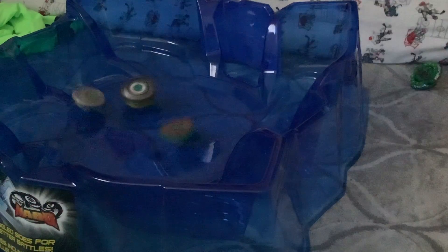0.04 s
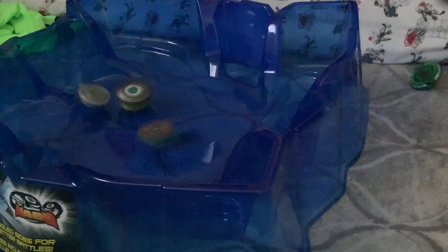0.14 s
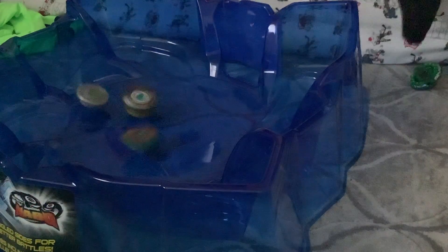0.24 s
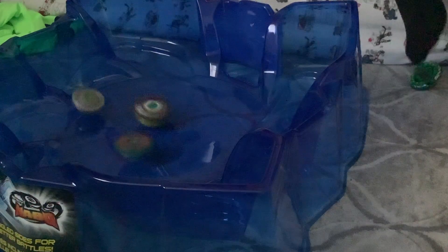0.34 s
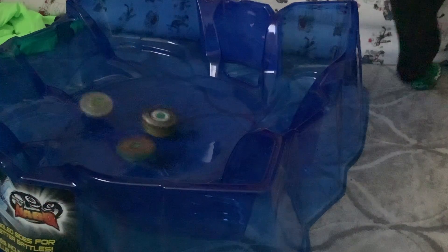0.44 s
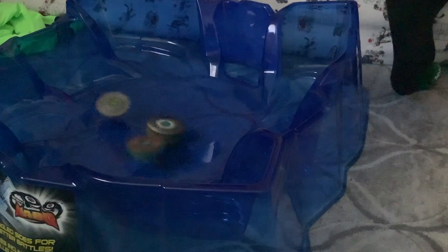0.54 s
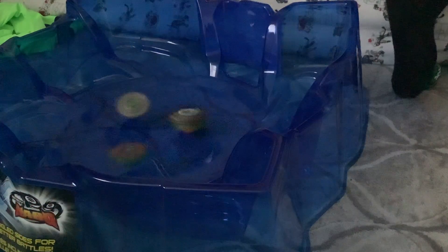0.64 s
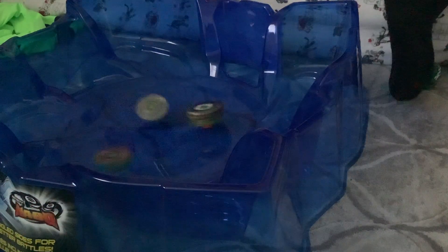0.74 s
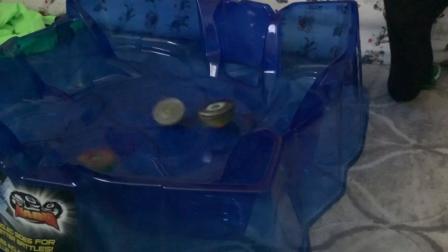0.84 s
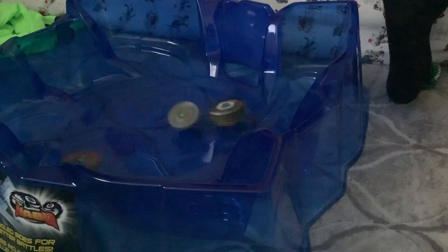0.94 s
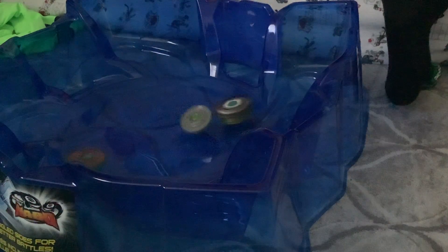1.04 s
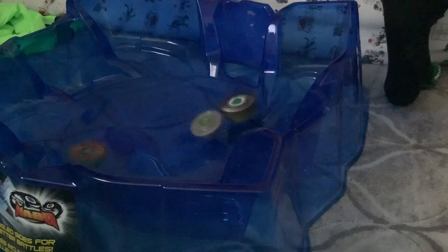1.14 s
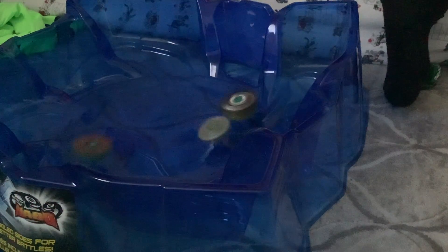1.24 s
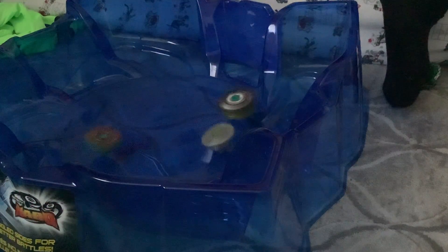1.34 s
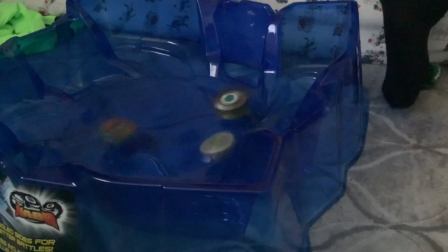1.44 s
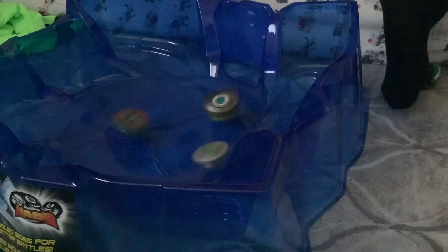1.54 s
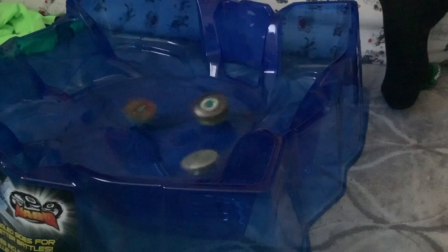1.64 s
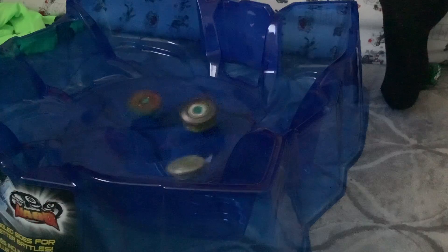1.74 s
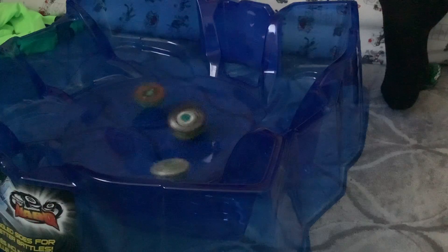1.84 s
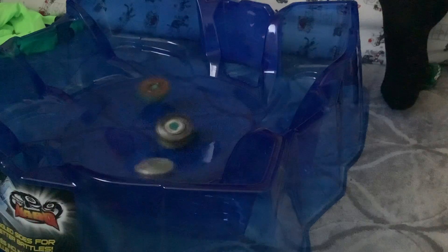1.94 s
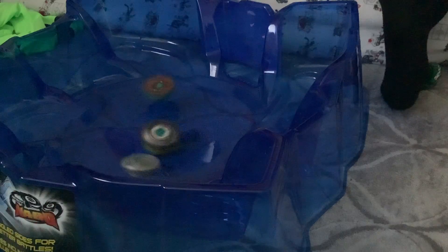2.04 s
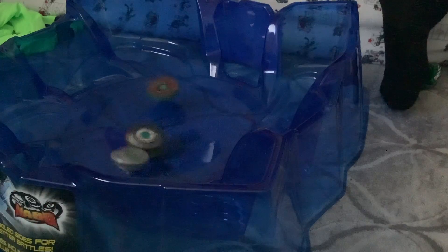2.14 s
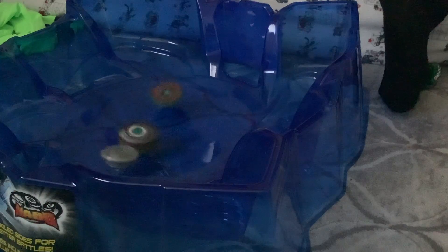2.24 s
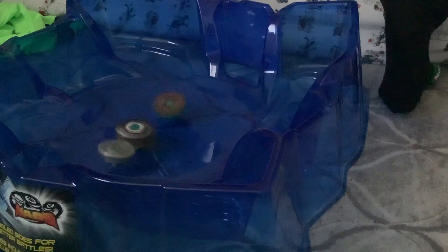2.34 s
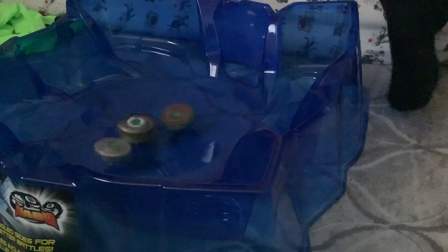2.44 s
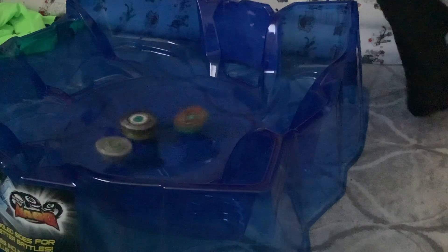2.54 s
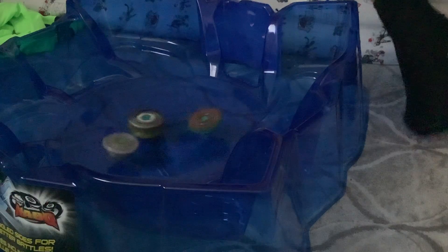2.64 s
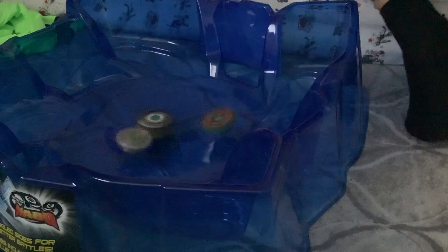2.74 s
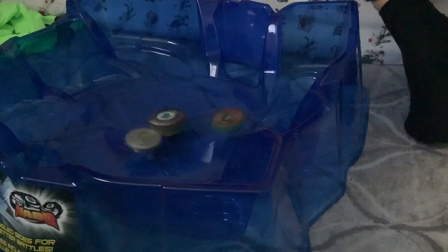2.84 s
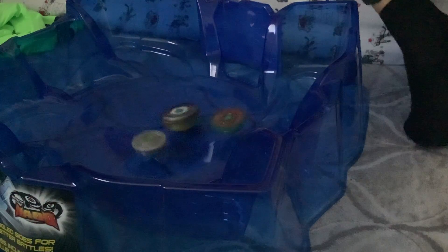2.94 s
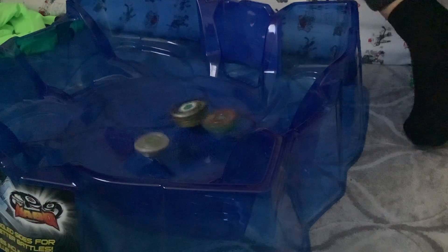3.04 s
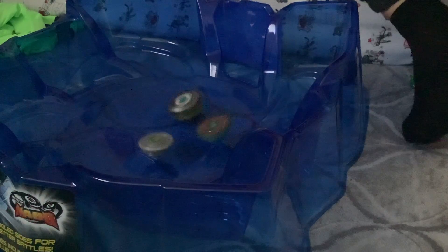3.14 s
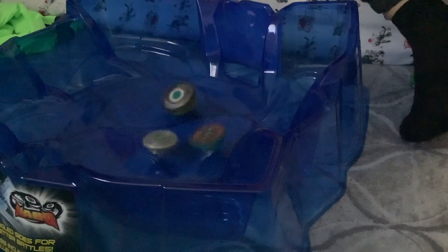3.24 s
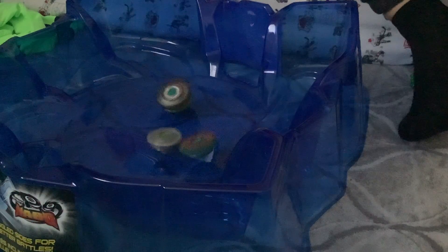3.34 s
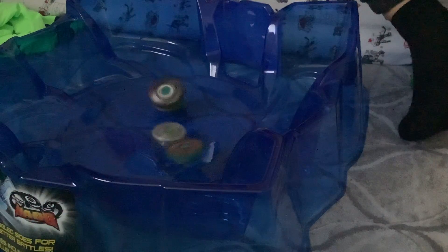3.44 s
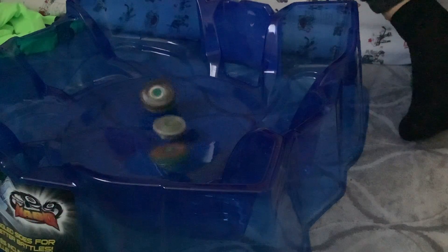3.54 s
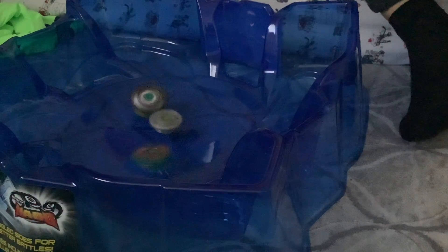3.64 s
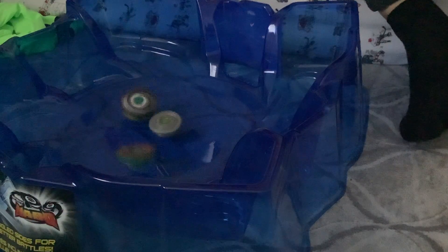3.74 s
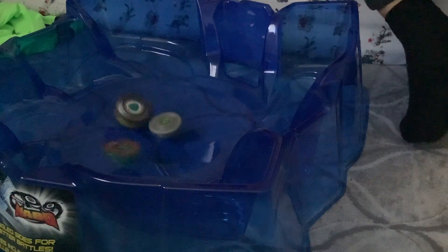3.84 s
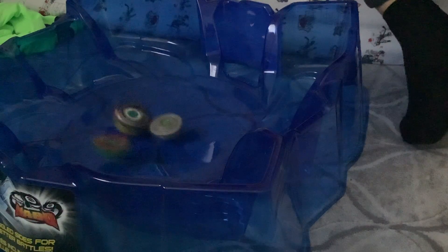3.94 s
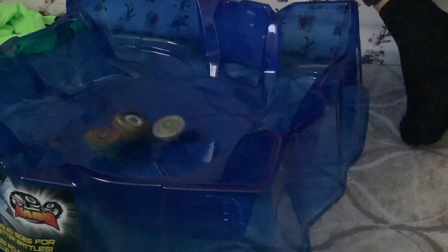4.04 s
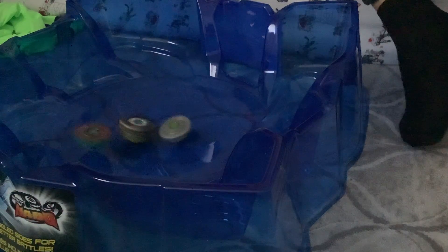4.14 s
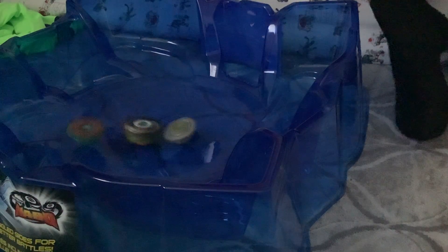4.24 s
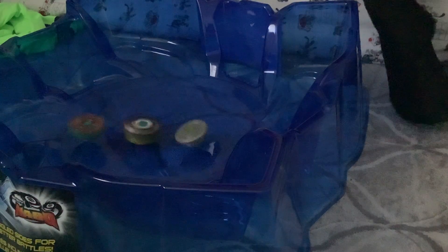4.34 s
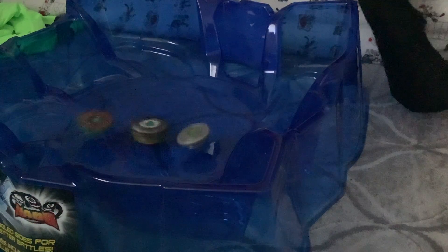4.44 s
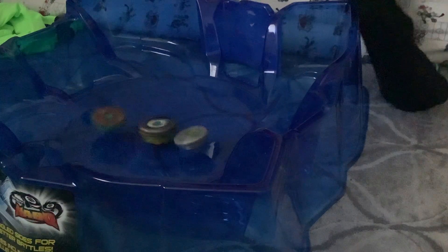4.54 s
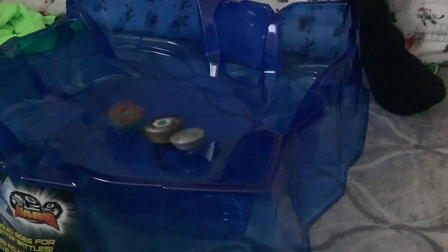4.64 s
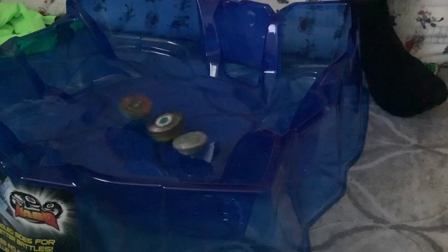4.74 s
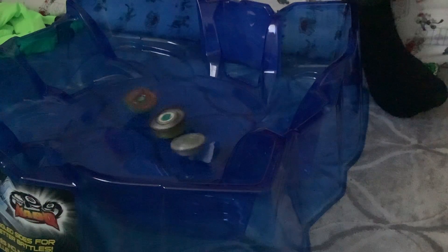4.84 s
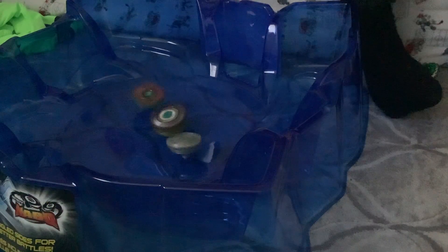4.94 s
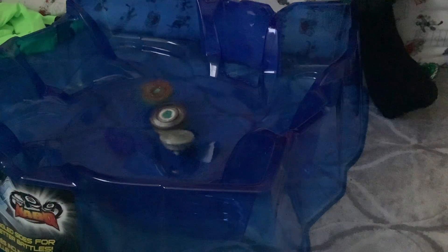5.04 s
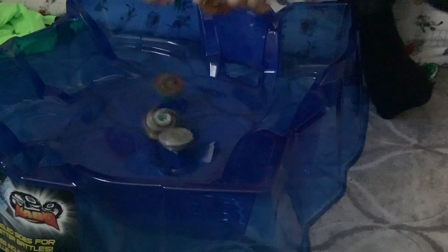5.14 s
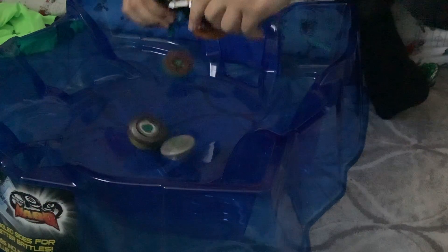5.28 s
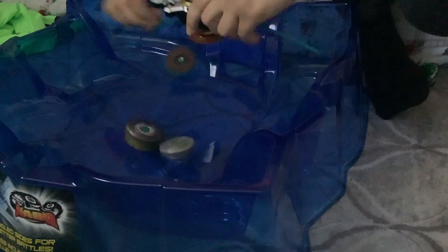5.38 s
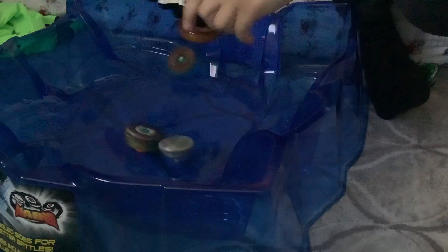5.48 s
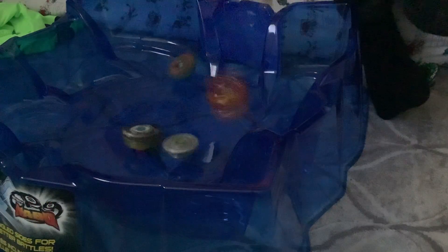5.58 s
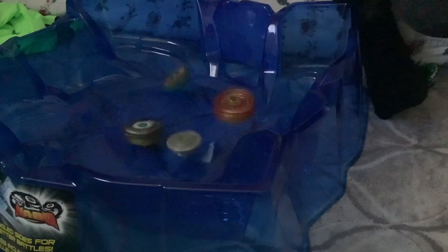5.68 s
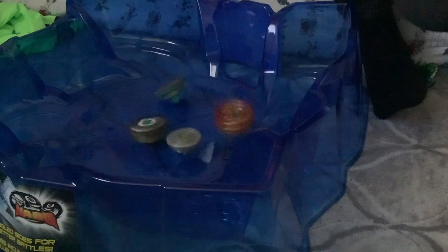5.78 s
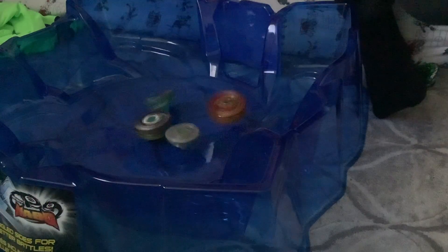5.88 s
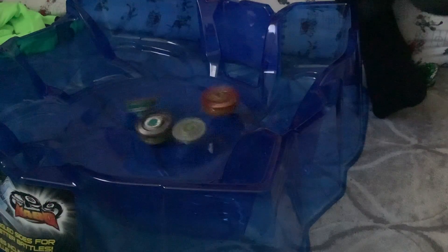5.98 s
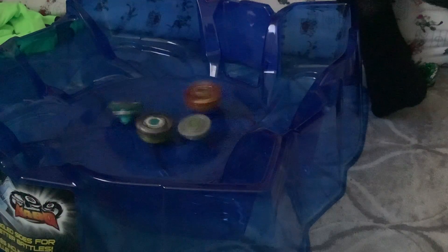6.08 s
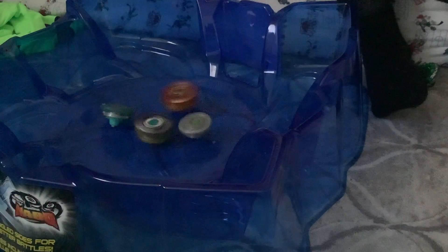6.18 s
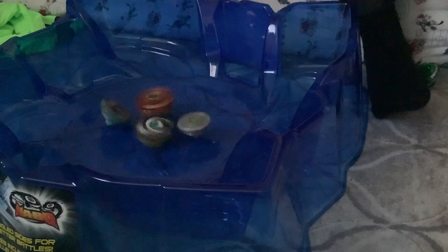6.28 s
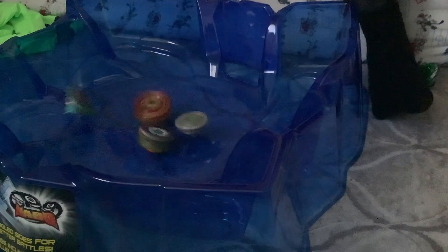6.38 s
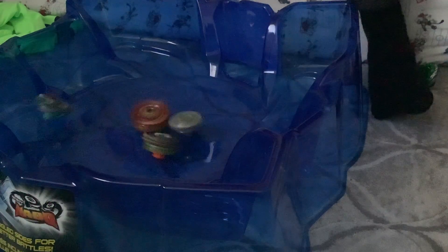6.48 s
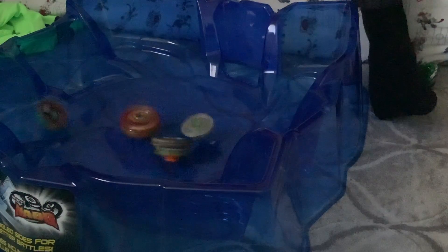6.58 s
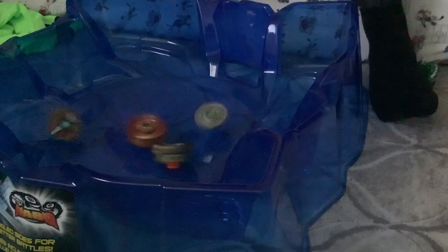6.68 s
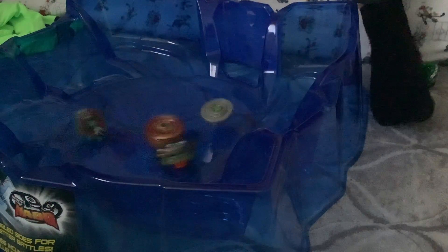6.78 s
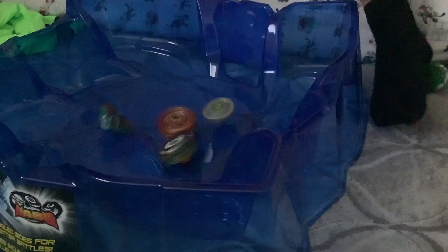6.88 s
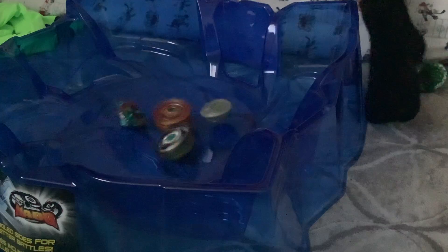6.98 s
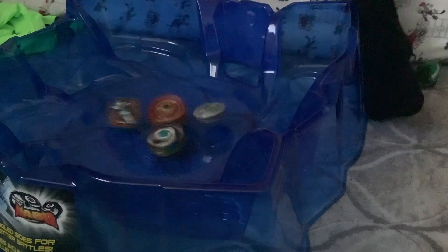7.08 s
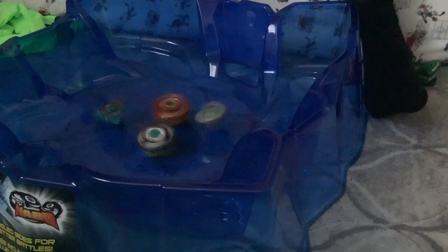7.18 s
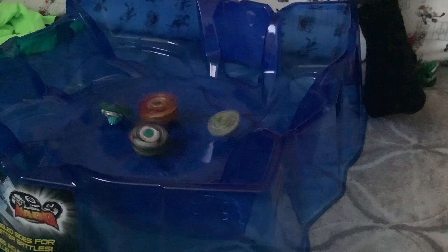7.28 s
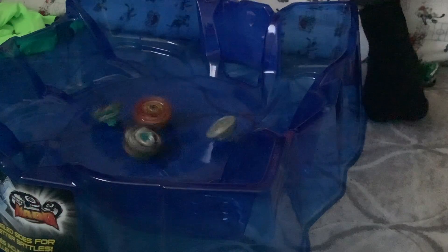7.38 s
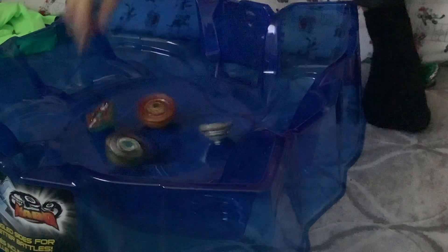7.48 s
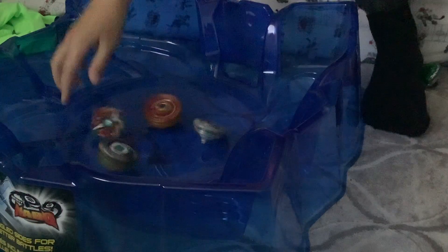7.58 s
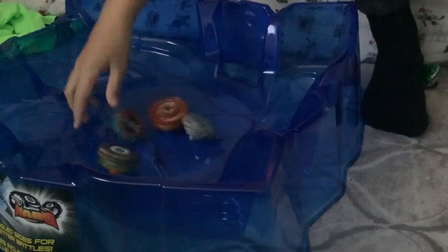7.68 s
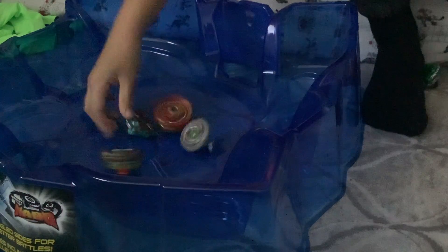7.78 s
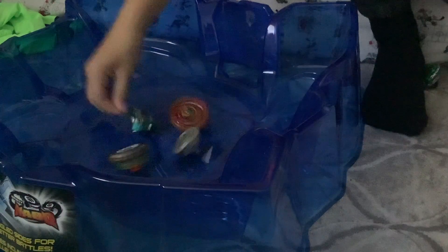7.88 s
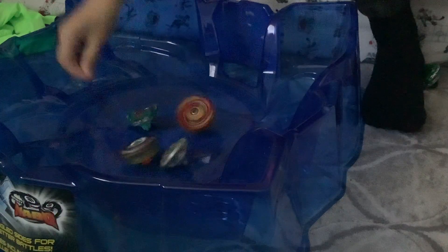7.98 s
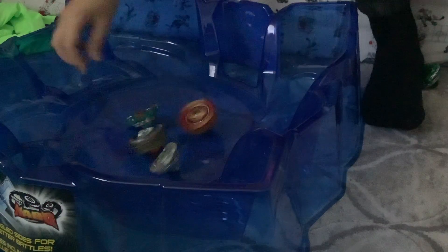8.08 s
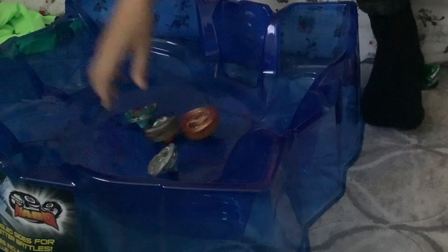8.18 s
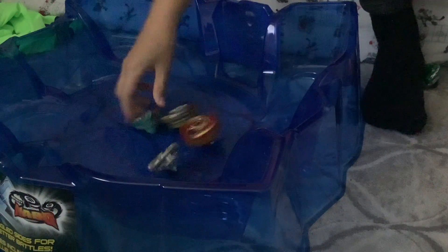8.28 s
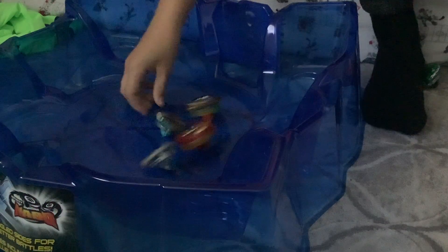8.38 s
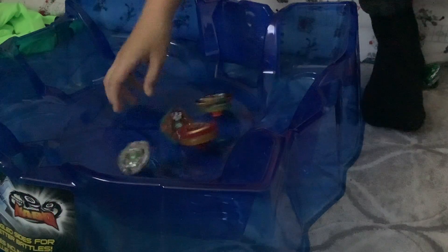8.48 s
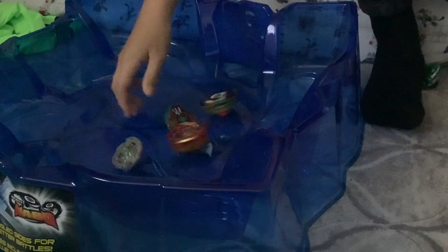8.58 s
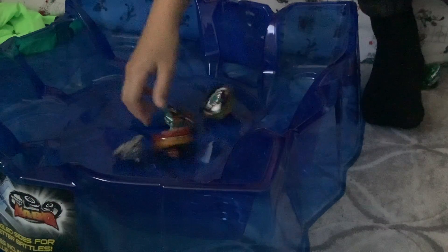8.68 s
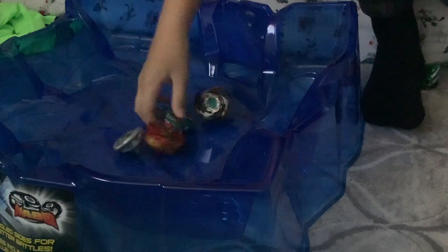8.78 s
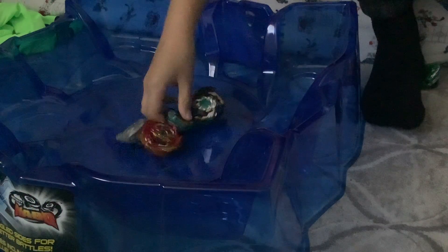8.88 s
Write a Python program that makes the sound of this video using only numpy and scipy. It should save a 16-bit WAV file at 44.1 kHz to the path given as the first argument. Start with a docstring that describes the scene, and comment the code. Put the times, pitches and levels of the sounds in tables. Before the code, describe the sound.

Close indoor sound of metal-rimmed tops in a thin plastic tray, with short dry reflections. A quiet low drone, wavering hum and fine grainy scrape run throughout. A double click comes at 0.3 s and a stronger one at 0.65, then mostly light rolling until 2.2. From 2.2 to 3.2 s bright clicks come in small clusters, with faint chirping skids. Single clicks at 3.7 and 4.0 lead to a cluster around 4.1-4.3 with a hollow knock, and another at 4.75. Sharp clicks at 5.2 precede slow ratchet teeth at 5.43, then a fast bright ripcord zip to about 5.6. At 5.7 a top lands with a loud crack and deep thud. Heavier clashes follow, strong at 5.87, 6.39 and 6.5, a thin metal ring at 6.56. Dense clicking and rough rumbling fill 7.1-8.45, notably boomy at 7.83, then weaker knocks and scraping to nearly 9 s.

```python
"""Spinning tops in a plastic arena

Metal-rimmed tops circle in a thin plastic arena in a small room, clashing with each other and the walls.
Noise bursts make the clicks, decaying sines the booms and rings, showers of tiny touches the scrape and rumble.
Filtered noise makes the drone and sines the hums; a ripcord launcher zips as a speeding train of tooth snaps,
then a top lands with a thud."""
import sys
import numpy as np
from scipy import signal
from scipy.fft import rfft, irfft, next_fast_len
from scipy.io import wavfile

SR = 44100
rng = np.random.default_rng(int(sys.argv[2]) if len(sys.argv) > 2 else 0)


def transcribe(signal):
    """Save signal, clipped to [-1, 1], as a 16-bit WAV file at the path in sys.argv[1]."""
    frames = np.atleast_2d(signal).T
    limited = np.clip(frames, -1, 1)
    pcm = np.round(limited * 32767).astype(np.int16)
    wavfile.write(sys.argv[1], SR, pcm)


N = 393372
T = np.arange(N) / SR
RING_T = T[:SR // 2]   # every ring and tail lasts half a second

# scrape of the upright tips as the tops roam the bowl: (time [s], relative level [dB])
ROAMING = [(0, -56.5), (1.3, -58.5), (1.8, -61), (2.8, -62.5), (3.5, -55), (4.6, -62.5), (5.1, -62),
           (6.9, -54.5), (7.08, -59.5), (8.9, -50)]
RUMBLE_OVER_SCRAPE_DB = 7.5
# a leaning top rolls on its rim: (start [s], length before release [s], relative rumble [dB], relative scrape [dB])
RIM_ROLLS = [(0.096, 0.43, -41, -52), (0.73, 0.042, -38.5, -49), (1.007, 0.07, -38.5, -46),
             (1.987, 0.21, -48.5, -60), (2.321, 0.054, -58, -46.5), (5.592, 0.24, -40.5, -47.5),
             (5.889, 0.34, -35, -41), (6.727, 0.084, -37, -45.5), (6.955, 0.042, -43, -52),
             (7.25, 0.031, -36, -43), (7.485, 0.053, -43, -45), (7.63, 0.39, -35, -42),
             (8.202, 0.16, -35, -40), (8.46, 0.052, -38.5, -47.5), (8.782, 0.081, -38.5, -46)]
LEAN_ATTACK_S, LEAN_RELEASE_DB_PER_S = 0.04, 157
# a clash leaves the tops wobbling: scrape relative to the click, and how fast they right themselves
WOBBLE_DB, SETTLE_DB_PER_S = -27.5, 95
# spectral outline of a tip scraping on plastic: (frequency [Hz], relative level per Hz [dB])
SCRAPE_OUTLINE = [(500, 7), (1100, 6), (1450, 1.5), (2300, 2.5), (2950, 2.5), (3600, -9), (9000, -19),
                  (15800, -48)]
# spectral outline of the tops' low drone: (frequency [Hz], relative level per Hz [dB])
DRONE_OUTLINE = [(35, -39), (50, -7.5), (72, 2), (95, 7), (125, 5.5), (170, -3), (240, -0.5), (330, 0.5)]
# a low hum of wandering pitch, heard as one top's spin: (time [s], mean spin [turns/s], relative level [dB])
SPIN = [(0.3, 165, -52), (0.6, 92, -47), (1.0, 75, -53), (1.3, 112, -70), (1.7, 89, -46.5), (2.1, 96, -56),
        (2.5, 77, -54), (5.5, 87, -86)]
# harmonics of its hum: (multiple of the spin [1], relative level [dB])
HUM_HARMONICS = [(1, -6), (2, -25), (3, -28)]
# a circling top briefly sets the tray humming: (start [s], length before release [s], starting pitch [Hz], level [dB])
WHIRRS = [(0.06, 0.32, 182, -45.5), (1.039, 0.066, 251.5, -42), (3.47, 0.3, 156, -57),
          (6.13, 0.11, 420, -35)]
WHIRR_RISE_HZ_PER_S = 66
# rims just brushing each other: (time [s], relative level [dB], note of the plastic shell [Hz])
GRAZES = [(0.134, -46, 9000), (1.035, -38.5, 9200), (1.454, -46.5, 9000), (1.869, -47, 9100),
          (2.1746, -28.5, 4200), (2.186, -26.5, 2900), (3.4075, -32, 4400), (4.115, -29.5, 4440),
          (4.3216, -34, 4370), (7.225, -21.5, 5660), (7.394, -25.5, 5700), (7.437, -28, 5700),
          (7.824, -27, 5530), (8.185, -23, 5540), (8.264, -27, 5700)]
# clashes: (time [s], relative click of the rims [dB], relative boom of the arena floor [dB])
CLASHES = [(0.2679, -21.5, -39), (0.2852, -22, -36), (0.641, -15.5, -40.5), (2.2496, -27.5, -44),
           (2.2782, -22, -42.5), (2.4773, -23, -38), (2.5082, -22, -35), (2.8418, -23.5, -40.5),
           (2.985, -21, -37), (3.1677, -20.5, -34), (3.7438, -21.5, -39.5), (4.0156, -23, -40.5),
           (4.1322, -21.5, -35), (4.2318, -24.5, -41), (4.3265, -23, -29), (4.711, -29, -38),
           (4.7692, -19.5, -30.5), (5.171, -22, -34.5), (5.205, -17, -66), (5.242, -20, -36.5),
           (5.6954, -14.5, -22), (5.8715, -20.5, -25.5), (5.985, -23, -29), (6.0028, -20.5, -39),
           (6.358, -24, -50), (6.3875, -13, -27), (6.4909, -24.5, -27), (6.5237, -21, -27.5),
           (6.561, -18.5, -29), (6.6781, -21.5, -31.5), (7.1014, -23, -37), (7.1191, -20.5, -30.5),
           (7.152, -22.5, -34.5), (7.226, -33, -32), (7.243, -23, -35.5), (7.3963, -30.5, -35.5),
           (7.4456, -19.5, -31.5), (7.7603, -23, -35), (7.8297, -18.5, -24.5), (7.939, -24.5, -35),
           (8.1883, -24.5, -30.5), (8.299, -23, -40), (8.3511, -28.5, -44), (8.4477, -23.5, -34),
           (8.5468, -30, -44), (8.6187, -34.5, -39.5), (8.7341, -34, -28), (8.801, -31, -55)]
# the wall's knock lies between click and boom: offset, and share that follows the boom
KNOCK_OFFSET_DB, KNOCK_FOLLOWS_BOOM = -11.5, 0.42
# outline of the rims' crowded modes: (frequency [Hz], relative level per Hz [dB])
RIM_OUTLINE = [(1400, -8.5), (2200, -1.5), (2850, 5), (3450, -7.5), (5000, -3.5), (7000, -4.5), (9200, 2),
               (11000, -4.5), (13800, -3), (15900, -10)]
# outline of the walls' crowded modes: (frequency [Hz], relative level per Hz [dB])
WALL_OUTLINE = [(480, -9.5), (600, 4.5), (700, -0.5), (870, -0.5), (1000, 2), (1150, -0.5), (1350, -7),
                (2000, -9), (2800, -9.5), (3500, -21)]
# outline of the whole tray's low modes: (frequency [Hz], relative level per Hz [dB])
TRAY_OUTLINE = [(55, -47), (80, 4.5), (125, -2.5), (170, 0), (230, -5), (330, 1.5)]
# modes of the arena floor: (nominal frequency [Hz], relative level [dB], t60 [s])
FLOOR_MODES = [(236.6, -6.5, 0.074), (280.7, -4.5, 0.18), (342, -13.5, 0.11), (381.1, -4, 0.22),
               (396.4, -0.5, 0.19), (409.5, -3.5, 0.088), (454, -2, 0.14), (493.7, -3.5, 0.082)]
# modes of the arena wall: (frequency [Hz], relative level [dB], t60 [s])
WALL_MODES = [(757, -9.5, 0.19), (862, 1.5, 0.18), (992, -0.5, 0.079), (1160, 7, 0.12)]
# tops landing so heavily that the whole tray flexes: (time [s], relative level [dB])
THUDS = [(0.642, -32), (5.698, -12.5), (5.867, -25), (6.391, -20), (6.493, -23.5), (7.83, -31.5)]
# a top thrown squarely against the wall: (time [s], relative level [dB], note of the struck panel [Hz])
WALL_HITS = [(1.06, -52.5, 1004), (2.2493, -39.5, 725), (4.3295, -35, 1030), (5.697, -26, 1000),
             (5.714, -27.5, 575), (5.871, -32.5, 1217), (6.3894, -32, 840), (6.4911, -31, 1480),
             (7.7604, -47, 844)]
PANEL_Q, PANEL_DB = 29, 4   # ringing of the struck panel, and its level over the hit's
# a spinning rim skids along another with a short chirp: (start [s], length [s], pitch [Hz], relative level [dB])
SKIDS = [(2.175, 0.09, 2680, -50), (2.353, 0.097, 2700, -45), (2.575, 0.076, 4300, -47),
         (3.661, 0.035, 4300, -48.5), (3.883, 0.035, 4260, -57)]
# square blows that leave a metal weight ring singing: (time [s], level [dB])
SINGS = [(4.329, -39), (6.562, -28.5), (7.245, -43)]
# modes of the weight ring: (frequency [Hz], relative level [dB], t60 [s])
RING_MODES = [(6751, -17, .7), (7775, -12, 0.31), (7830, 3, 0.34), (12400, 0, 0.25), (14500, 8.5, 0.19)]
# first slow teeth of the ratchet: (time [s], relative level [dB])
FIRST_TEETH = [(5.429, -35.5), (5.453, -34), (5.474, -35), (5.489, -40)]
# the pull on the ripcord: (time [s], mean tooth rate [teeth/s], relative level [dB])
PULL = [(5.484, 85, -120), (5.489, 156, -26.5), (5.515, 302, -25), (5.548, 494, -20.5), (5.583, 400, -26.5),
        (5.612, 260, -50), (5.69, 200, -120)]
# spectral outline of the launcher's ratchet: (frequency [Hz], relative level per Hz [dB])
RATCHET_OUTLINE = [(530, -28), (900, -8.5), (1740, -10.5), (1960, -8.5), (2780, 3), (3490, -6.5),
                   (4130, -1), (4490, -8.5), (6280, -5.5), (9320, -2.5), (10800, -6), (14000, 1),
                   (15800, -8)]
# the faster the teeth pass, the more treble they throw: corner, and level at full speed
ZIP_HZ, ZIP_DB = 11000, -2
# direct sound, then echoes from the arena's sides and the room's nearest surfaces:
# (nominal delay [s], relative level [dB])
ECHOES = [(0, -0.5), (.0012, -2), (.003, -1.5), (.016, -4.5), (0.019, -3)]
SLAP_S, SLAP_DB = .018, -7   # single echo off the room's nearest wall
CUTOFF_HZ = 15900


def from_db(db):
    """Decibels to gain."""
    return 10 ** (np.asarray(db) / 20)


def rms_one(x):
    """Scale to an rms of 1."""
    return x / np.sqrt(np.mean(x ** 2) + 1e-20)


def in_time(rows):
    """Each column of a curve at every sample."""
    s, *columns = np.transpose(rows)
    return [np.interp(T, s, c) for c in columns]


def gain_at(outline, hz):
    """Gain of a spectral outline, drawn over log frequency and as good as silent beyond its ends."""
    f, db = np.transpose(outline)
    return from_db(np.interp(np.log(hz + 1e-9), np.log(f), db, left=-200, right=-200))


def add(out, s, sound):
    """Mix a sound in at a time."""
    i = round(s * SR)
    out[i:i + len(sound)] += sound[:N - i]


def through(x, response):
    """Pass a signal through an impulse response."""
    return signal.oaconvolve(x, response)[:N]


def resonate(x, hz, q):
    """Keep what lies around one resonance."""
    return signal.lfilter(*signal.iirpeak(hz, q, fs=SR), x)


def coloured(outline):
    """Noise with a given outline, rms 1."""
    size = next_fast_len(N)
    hz = np.arange(size // 2 + 1) * SR / size
    spectrum = rfft(rng.standard_normal(size)) * gain_at(outline, hz)
    return rms_one(irfft(spectrum, size)[:N])


def drift(per_s):
    """Slow random wander, rms 1, with a new random target so many times a second."""
    knots = rng.standard_normal(N // 20)
    return rms_one(np.interp(T * per_s, np.arange(len(knots)), knots))


def grains(per_s, spread_db):
    """Random tiny contacts of uneven size, rms 1."""
    sizes = from_db(spread_db * np.minimum(rng.exponential(1, N), 4)) * rng.choice([-1, 1], N)
    return rms_one(sizes * (rng.random(N) < per_s / SR))


def crowded_rings(outline, t60, count, rise_s=1e-4):
    """Modes too crowded to tell apart: a dying noise burst for each blow, cut from a random place."""
    noise = coloured(outline)
    starts = rng.integers(0, N - len(RING_T), count)
    bursts = noise[starts[:, None] + np.arange(len(RING_T))]
    return bursts * from_db(-60 * RING_T / t60) * (1 - np.exp(-RING_T / rise_s))


def modal_rings(modes, spread_db, count, detune=0):
    """One ring for each blow: the spot sets each mode's strength and sign, the top's weight detunes them."""
    hz, db, t60 = np.transpose(modes)[:, :, None]
    strength = from_db(db.T + spread_db * rng.standard_normal((count, len(hz))))
    strength *= rng.choice([-1, 1], strength.shape) / np.linalg.norm(strength, axis=1, keepdims=True)
    pitches = hz * (1 + detune * rng.standard_normal((count, len(hz), 1)))
    fading = from_db(-60 * RING_T / t60)
    return np.array([gains @ (np.sin(2 * np.pi * f * RING_T) * fading) for gains, f in zip(strength, pitches)])


def blows(times, levels_db, rings):
    """Set each ring at its time and level."""
    out = np.zeros(N)
    for s, db, sound in zip(times, levels_db, rings):
        add(out, s, from_db(db) * sound)
    return out


def scatter(touches, rings):
    """Deal each touch to one of several rings of unit energy."""
    out = np.zeros(N)
    rings = rings / np.linalg.norm(rings, axis=1, keepdims=True)
    dealt = rng.integers(0, len(rings), N)
    for i in np.flatnonzero(touches):
        add(out, i / SR, touches[i] * rings[dealt[i]])
    return out


def diffuse(t60, build_s):
    """A room tail of unit energy: separate reflections at first, crowding together as it dies away."""
    share = np.minimum(.02 + (RING_T / .12) ** 2, 1)   # share of samples holding a reflection
    reflections = rng.standard_normal(len(RING_T)) * (rng.random(len(RING_T)) < share) / np.sqrt(share)
    tail = reflections * from_db(-60 * RING_T / t60) * (1 - np.exp(-RING_T / build_s))
    return tail / np.linalg.norm(tail)


def slap(x):
    """The nearest wall of the room throws the arena's notes back once."""
    out = x.copy()
    add(out, SLAP_S, from_db(SLAP_DB) * x)
    return out


def snap(outline):
    """A click with a given outline, its energy packed as early as possible (minimum phase)."""
    size = 4096
    hz = np.arange(size // 2 + 1) * SR / size
    gain = np.maximum(gain_at(outline, hz), from_db(-36.0))
    # folding the cepstrum onto positive time gives minimum phase
    cepstrum = irfft(np.log(gain))[:size // 2]
    cepstrum[1:] *= 2
    return irfft(np.exp(rfft(cepstrum, size)))[:size // 2]


def contacts(outline, t60, tail_db, dull_db, count):
    """Each contact chatters briefly at a spot of its own, with echoes, a bright tail and a longer dull one."""
    soft_walls = signal.butter(2, 3000, fs=SR, output="sos")
    t = T[:SR // 20]
    fading = from_db(-60 * t / t60) * (1 - np.exp(-t / 0.00024))
    heard = []
    for _ in range(count):
        response = from_db(tail_db) * diffuse(t60=0.18, build_s=0.0072)
        response += from_db(dull_db) * signal.sosfilt(soft_walls, diffuse(t60=0.25, build_s=0.016))
        for s, db in ECHOES:
            chatter = fading * rng.standard_normal(len(t)) ** 3   # a few of the tiny touches dominate
            i = round(s * (1 + .06 * rng.uniform(-1, 1)) * SR)
            response[i:i + len(t)] += from_db(db) * chatter / np.linalg.norm(chatter)
        # the spot that is struck favours some modes over others
        hz = np.geomspace(outline[0][0], outline[-1][0], num=90)
        favour = from_db(4.7 * rng.standard_normal(len(hz)))
        colour = snap(np.column_stack([hz, 20 * np.log10(gain_at(outline, hz) * favour)]))
        sound = signal.fftconvolve(response, colour)[:len(RING_T)]
        heard.append(sound / np.linalg.norm(sound))
    return np.array(heard)


def lean(length):
    """Envelope of a top leaning over, holding, and righting itself."""
    t = T[:SR]
    release = from_db(-LEAN_RELEASE_DB_PER_S * np.maximum(t - length, 0))
    return np.minimum(t / LEAN_ATTACK_S, 1) * release


def roughness():
    """Rumble and scrape (dB): roaming on the tips, plus wobble after each clash and rolls on the rim."""
    roaming_db, = in_time(ROAMING)
    s, click_db, _ = np.transpose(CLASHES)
    # powers add up, so everything is squared
    kicks = np.bincount((s * SR).astype(int), from_db(click_db + WOBBLE_DB) ** 2, N)
    wobble = signal.lfilter([1], [1, -from_db(-SETTLE_DB_PER_S / SR) ** 2], kicks)
    scrape = from_db(roaming_db) ** 2 + wobble
    rumble = scrape * from_db(RUMBLE_OVER_SCRAPE_DB) ** 2
    for start, length, rumble_db, scrape_db in RIM_ROLLS:
        add(rumble, start, (from_db(rumble_db) * lean(length)) ** 2)
        add(scrape, start, (from_db(scrape_db) * lean(length)) ** 2)
    return 10 * np.log10(rumble), 10 * np.log10(scrape)


def running(rumble_db, scrape_db):
    """Tips and rims skip over the plastic: a fine scrape, stray ticks, and the floor's modes below."""
    pressure = from_db(scrape_db + 2.0 * drift(per_s=34))
    scrapes = contacts(SCRAPE_OUTLINE, t60=0.009, tail_db=-1.5, dull_db=-9.5, count=10)
    ticks = contacts(RIM_OUTLINE, t60=0.0042, tail_db=3.5, dull_db=-19, count=6)
    floor = modal_rings(FLOOR_MODES, spread_db=2.0, count=12)
    scrape = from_db(-1.5) * scatter(grains(per_s=380, spread_db=3.0), scrapes)
    ticking = from_db(-11.5) * scatter(grains(per_s=90, spread_db=4.0), ticks)
    rumble = scatter(grains(per_s=700, spread_db=4.0), floor)
    return pressure * (scrape + ticking) + from_db(rumble_db - 3.5) * rumble


def drone(rumble_db):
    """The spinning tops shake the tray, more so when they run roughly."""
    strength = np.hypot(from_db(-57.0), from_db(rumble_db - 12.5))
    return coloured(DRONE_OUTLINE) * from_db(4.5 * drift(per_s=4.3)) * strength


def spin_hum():
    """A top slightly out of balance hums at its spin rate, the pitch wandering up and down."""
    turns_per_s, hum_db = in_time(SPIN)
    angle = 2 * np.pi * np.cumsum(turns_per_s + 0.79 * drift(per_s=9.1)) / SR
    hum = np.zeros(N)
    for multiple, db in HUM_HARMONICS:
        hum += from_db(hum_db + db + 2 * drift(per_s=6.94)) * np.sin(round(multiple) * angle)
    return hum


def whirrs():
    """Short, unsteady low hums of the tray, rising as a leaning top runs down the bowl."""
    out = np.zeros(N)
    waver, flutter = 1 + 0.0264 * drift(per_s=30), from_db(3.3 * drift(per_s=25))
    for start, length, hz, db in WHIRRS:
        here = slice(round(start * SR), round(start * SR) + SR)
        pitch = (hz + WHIRR_RISE_HZ_PER_S * T[:SR]) * waver[here]
        tone = np.sin(2 * np.pi * np.cumsum(pitch) / SR)
        add(out, start, from_db(db) * lean(length) * flutter[here] * tone)
    return out


def grazes():
    """A glancing touch ticks with the broad note of a plastic shell."""
    s, db, notes = np.transpose(GRAZES)
    ticks = contacts(RIM_OUTLINE, t60=0.012, tail_db=3, dull_db=7.5, count=len(s))
    shell = np.array([resonate(tick, hz, q=3) for hz, tick in zip(notes, ticks)])
    return blows(s, db + 13.0, ticks + from_db(4.5) * shell)


def wall_knocks(count):
    """The thin wall's knock: a short clatter and a few ringing modes."""
    clatter = contacts(WALL_OUTLINE, t60=0.031, tail_db=1.5, dull_db=3, count=count)
    rings = modal_rings(WALL_MODES, spread_db=5, count=count)
    return from_db(29) * clatter + from_db(-3.5) * rings


def clashes():
    """The rims click, the wall knocks, and the recoil through the tips sets floor and tray booming."""
    s, click_db, boom_db = np.transpose(CLASHES)
    knock_db = KNOCK_OFFSET_DB + click_db + KNOCK_FOLLOWS_BOOM * (boom_db - click_db)
    clicks = contacts(RIM_OUTLINE, t60=0.013, tail_db=2.6, dull_db=3.5, count=len(s))
    floor = modal_rings(FLOOR_MODES, spread_db=4.5, count=len(s), detune=0.031)
    tray = from_db(-16.5) * crowded_rings(TRAY_OUTLINE, t60=0.28, count=len(s))
    swell = 1 - np.exp(-RING_T / 0.0052)   # the broad floor takes a moment to get going
    bright = blows(s, click_db + 18.0, clicks) + blows(s, knock_db, wall_knocks(count=len(s)))
    boom = slap(blows(s, boom_db + 6.5, swell * (floor + tray)))
    return bright, boom


def thuds():
    """A landing top rocks the tray on its lowest modes."""
    s, db = np.transpose(THUDS)
    return blows(s, db, crowded_rings(TRAY_OUTLINE, t60=0.19, count=len(s), rise_s=0.0096))


def wall_hits():
    """A square hit knocks the wall, and the struck panel rings with a note of its own."""
    s, db, notes = np.transpose(WALL_HITS)
    hz = notes[:, None]
    ringing = np.sin(2 * np.pi * hz * RING_T) * np.exp(-np.pi * hz * RING_T / PANEL_Q)
    return blows(s, db, wall_knocks(count=len(s))) + slap(blows(s, db + PANEL_DB, ringing))


def skids():
    """Rims stick and slip in a burst that swells, rings the shell and fades."""
    out, slips = np.zeros(N), grains(per_s=900, spread_db=2)
    for start, length, hz, db in SKIDS:
        swell = np.hanning(round(length * SR))
        chirp = rms_one(resonate(slips[round(start * SR):][:len(swell)], hz, q=5.2))
        add(out, start, from_db(db) * swell * chirp)
    return out


def singing_rings():
    """A weight ring sounds on after a square blow."""
    s, db = np.transpose(SINGS)
    return blows(s, db, modal_rings(RING_MODES, spread_db=2, count=len(s)))


def launcher():
    """The ripcord drags a pawl over its teeth, singly at first, then in a zip that brightens with speed."""
    teeth_per_s, pull_db = in_time(PULL)
    passed = np.floor(np.cumsum(teeth_per_s * from_db(1.0 * drift(per_s=200))) / SR)
    uneven = from_db(pull_db + 1.3 * rng.standard_normal(N))
    # scaling by the rate keeps the zip's level independent of its speed
    teeth = np.diff(passed, prepend=0) * uneven * np.sqrt(SR / teeth_per_s)
    snaps = contacts(RATCHET_OUTLINE, t60=0.009, tail_db=5.5, dull_db=4.5, count=12)
    rip = scatter(teeth, snaps)
    highpass = signal.butter(2, ZIP_HZ, "high", fs=SR, output="sos")
    treble = signal.sosfilt(highpass, scatter(teeth, snaps))
    brightness = from_db(ZIP_DB) * (teeth_per_s / teeth_per_s.max()) ** 2
    single_teeth = from_db(25.0) * blows(*np.transpose(FIRST_TEETH), snaps)
    return rip + brightness * treble + single_teeth


def scene():
    """Clashes and launch over the steady running of the tops; the arena's low notes linger in the room."""
    rumble_db, scrape_db = roughness()
    spinning = running(rumble_db, scrape_db) + drone(rumble_db) + spin_hum() + whirrs()
    bright, boom = clashes()
    low = boom + thuds()
    low = low + from_db(-9.0) * through(low, diffuse(t60=0.28, build_s=0.011))
    touches = grazes() + wall_hits() + skids() + singing_rings()
    return (spinning + bright + low + touches + launcher())[None]


def record(dry):
    """The microphone loses the deep bass; the extreme treble is cut steeply."""
    thin = signal.sosfilt(signal.butter(4, 58, "high", fs=SR, output="sos"), dry)
    return signal.sosfilt(signal.ellip(10, .3, 80, CUTOFF_HZ, fs=SR, output="sos"), thin)


dry = scene()
out = record(dry)
transcribe(out)
```